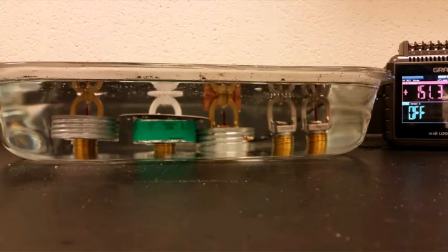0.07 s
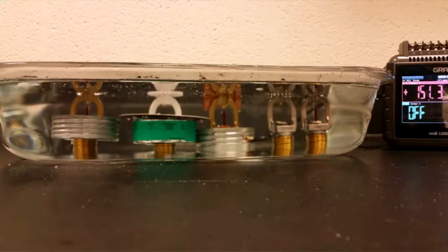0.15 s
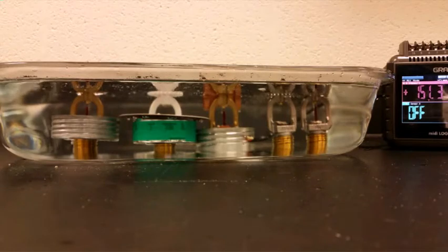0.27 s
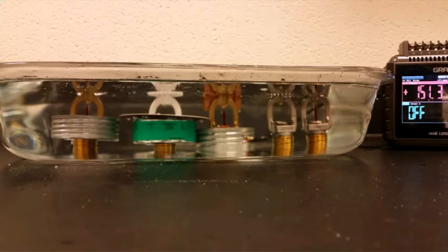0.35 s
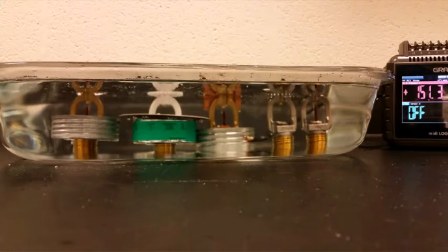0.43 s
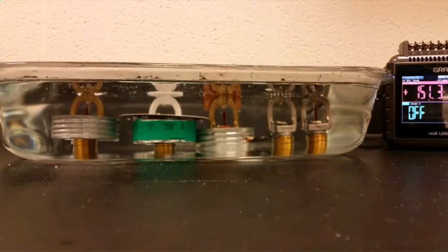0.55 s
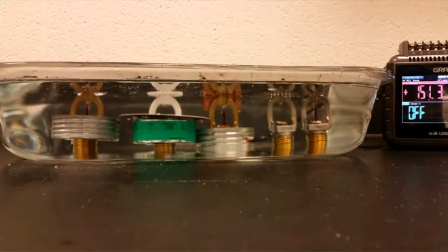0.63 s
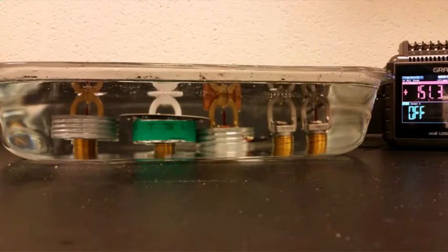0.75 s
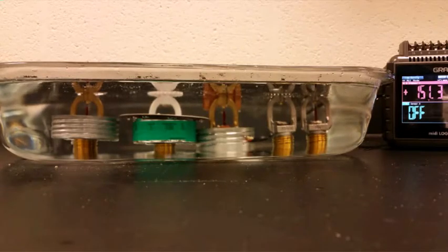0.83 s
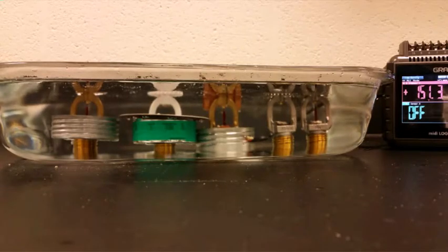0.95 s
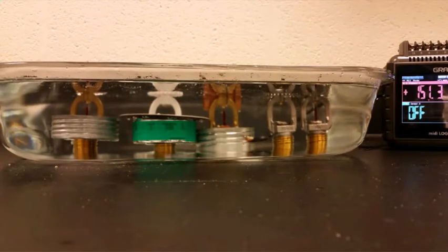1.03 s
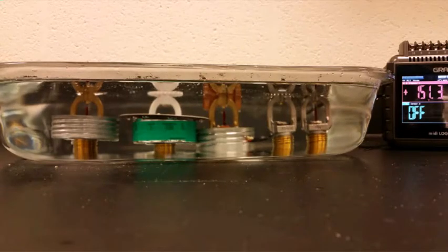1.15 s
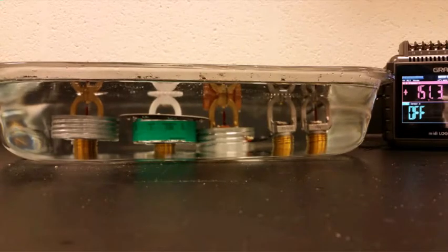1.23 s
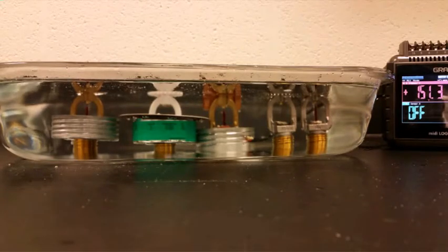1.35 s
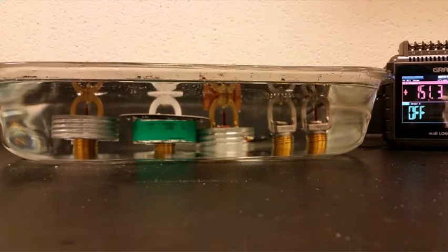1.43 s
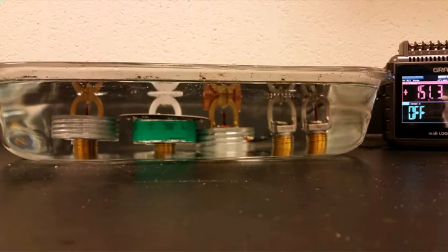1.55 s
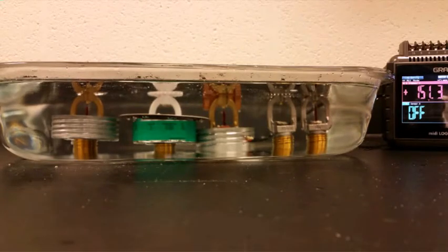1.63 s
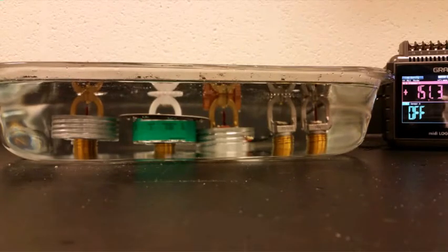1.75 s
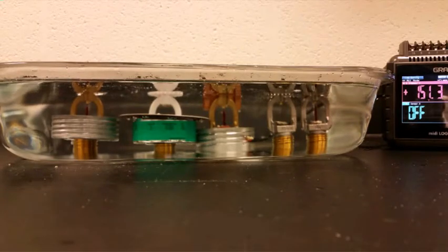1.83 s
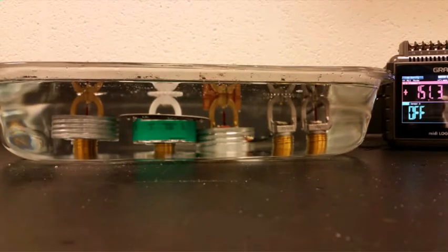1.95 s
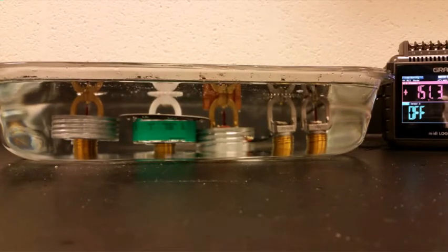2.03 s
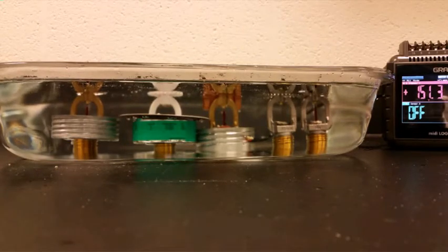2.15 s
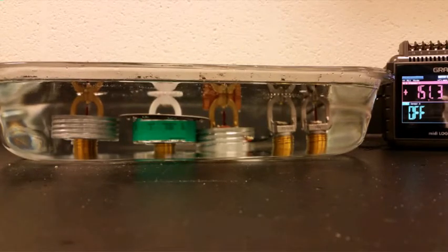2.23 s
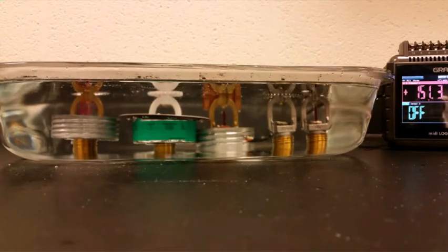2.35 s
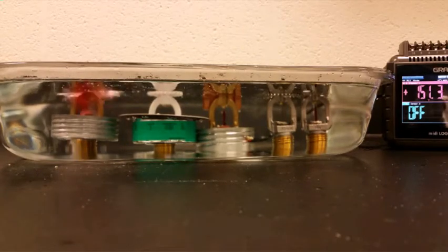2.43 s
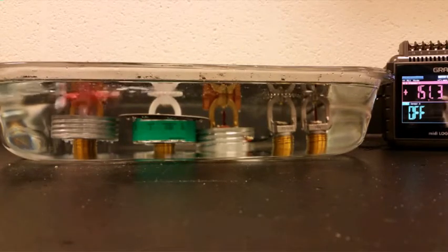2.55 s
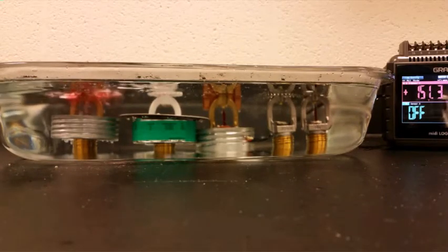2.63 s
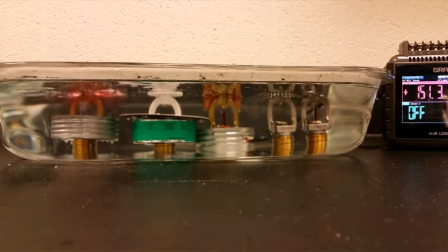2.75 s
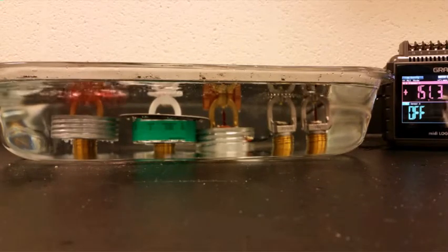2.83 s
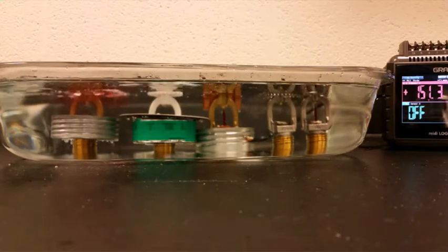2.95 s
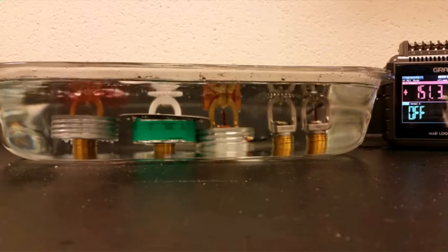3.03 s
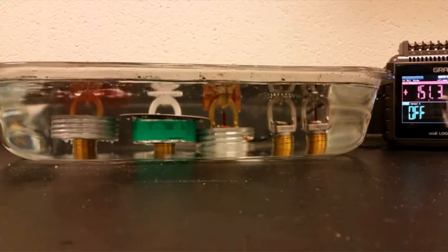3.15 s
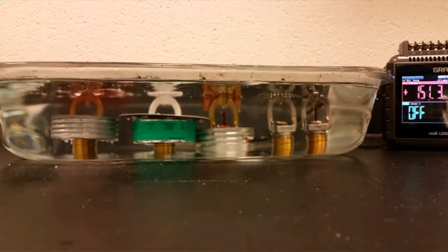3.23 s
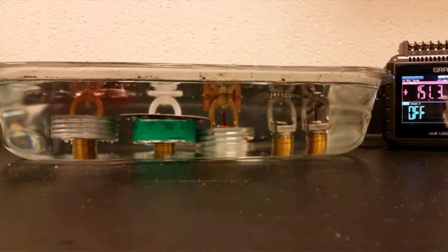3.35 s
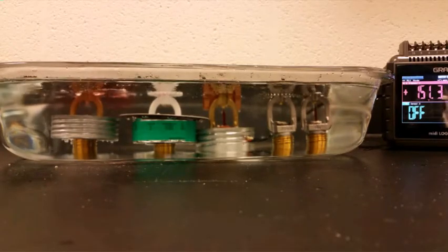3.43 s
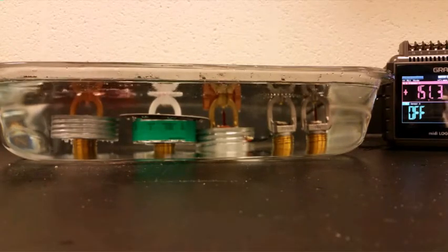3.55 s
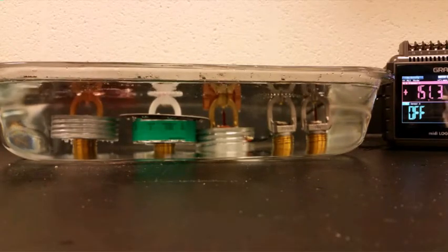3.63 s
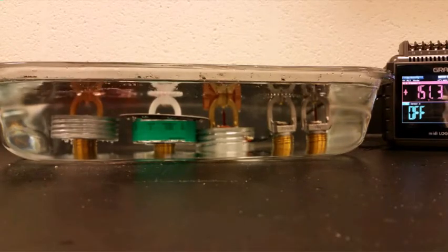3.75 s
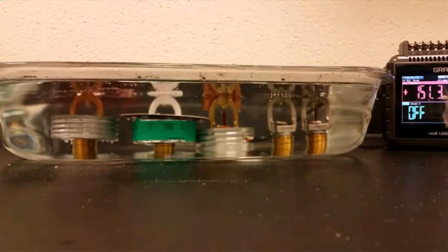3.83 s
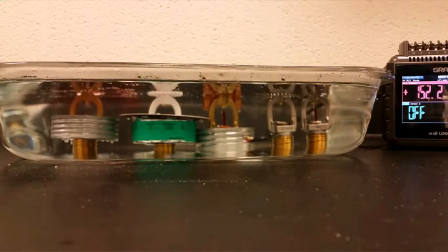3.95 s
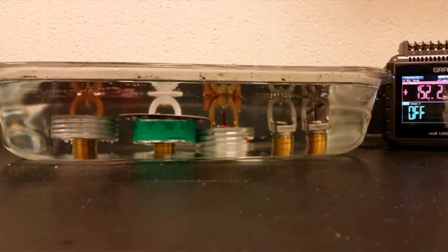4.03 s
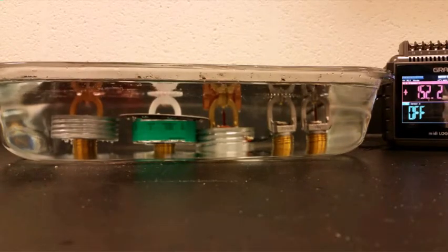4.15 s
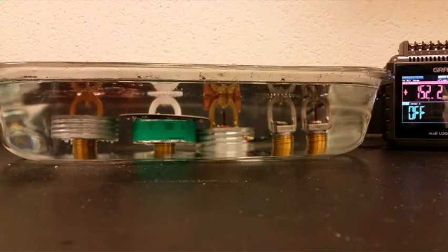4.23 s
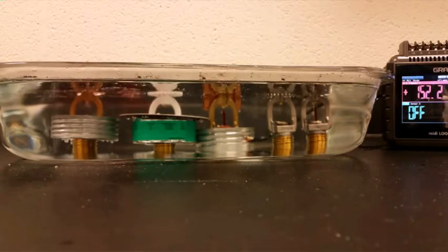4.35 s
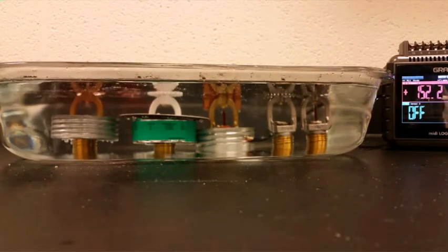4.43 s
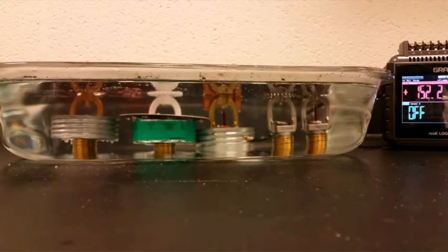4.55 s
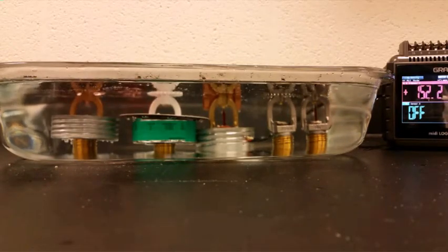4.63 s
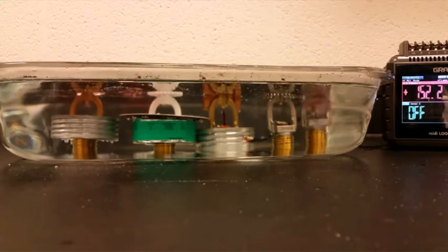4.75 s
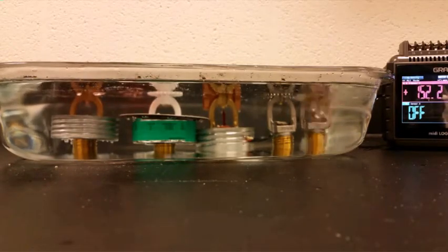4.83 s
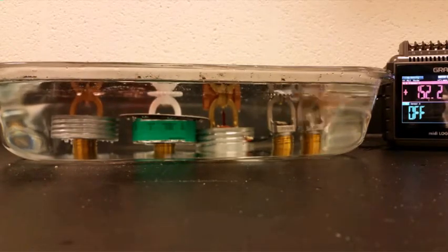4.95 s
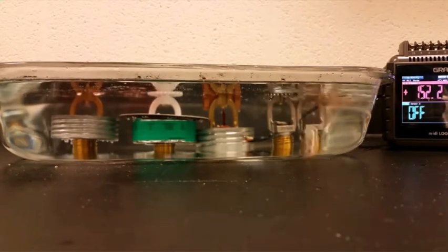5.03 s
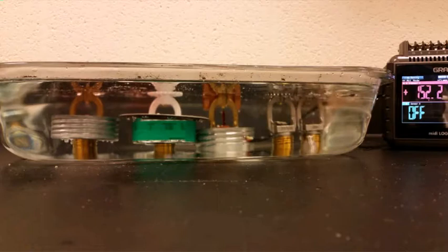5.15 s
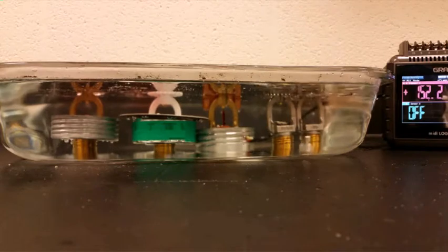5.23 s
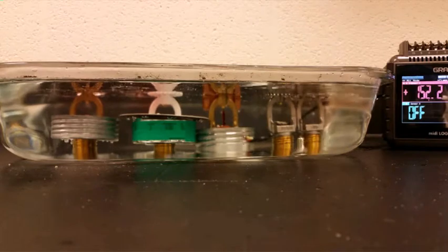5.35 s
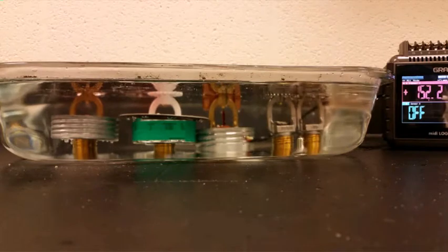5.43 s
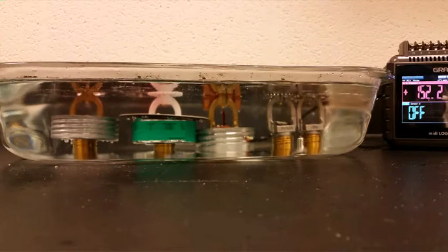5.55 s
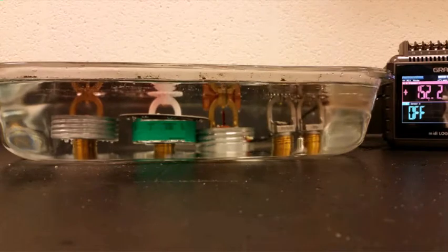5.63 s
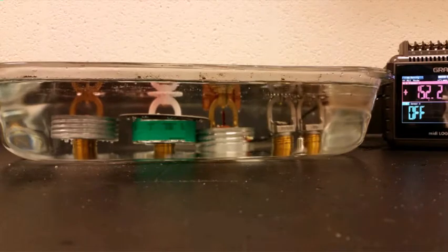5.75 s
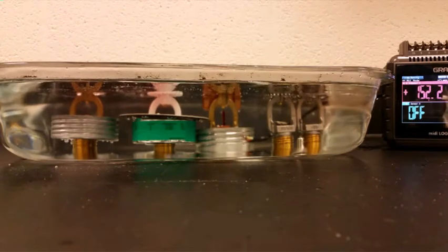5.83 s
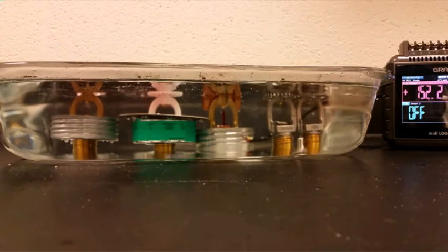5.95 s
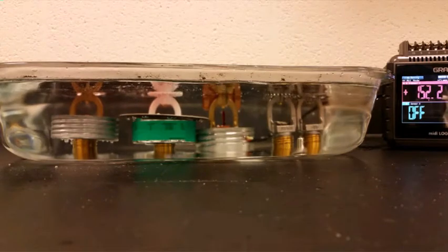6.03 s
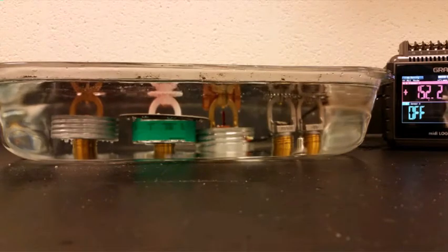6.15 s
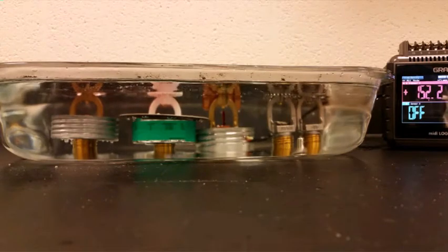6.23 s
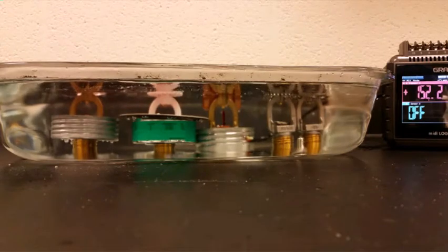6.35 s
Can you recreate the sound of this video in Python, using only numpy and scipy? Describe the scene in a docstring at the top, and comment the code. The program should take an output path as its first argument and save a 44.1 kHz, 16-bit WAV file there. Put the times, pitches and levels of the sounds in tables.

```python
"""A small room with a humming appliance, where two liquid-filled glass bulbs burst in a dish of hot water on a table.
Each burst is filtered fracture noise that excites decaying modes: the dish's glass rings and its body rocks.
The freed fittings knock against the same end of the dish; after the second burst splinters tick and skitter
over the bottom, the smaller the brighter. Wavering tones make the hum, shaped noise the fan rumble and hiss.
The recorder's gain control ducks the room after each burst, and its noise suppressor dulls what is left."""
import sys
import numpy as np
from scipy import signal
from scipy.fft import rfft, irfft
from scipy.io import wavfile
from scipy.ndimage import uniform_filter1d, minimum_filter1d

SR = 44100
rng = np.random.default_rng(int(sys.argv[2]) if len(sys.argv) > 2 else 0)


def persist_wave(psi):
    """Save psi, clipped to +-1, as 16-bit WAV."""
    counts = np.round(np.clip(psi, -1, 1) * 32767).astype(np.int16)
    wavfile.write(sys.argv[1], SR, np.atleast_2d(counts).T)


N = 281358
T = np.arange(N) / SR
FREQS = np.fft.rfftfreq(N, 1 / SR)


def undb(db):
    """Level law: amplitude gain is ten to the power of decibels over twenty."""
    return 10 ** (np.asarray(db) / 20)


def unit(x):
    """Normalization: scale a signal to an rms of 1."""
    return x / np.sqrt(np.mean(x ** 2))


def curve(points, freqs=FREQS):
    """Interpolation: read (Hz, value) points on a log-frequency axis."""
    hz, value = np.transpose(points)
    return np.interp(np.log(freqs + 1), np.log(hz), value)


def shape(x, gain):
    """Linear filtering: multiply the spectrum by a gain for each frequency."""
    return irfft(rfft(x) * gain, N)


def below(edge_hz, order):
    """Butterworth low-pass: the magnitude of its gain at each frequency."""
    return 1 / np.sqrt(1 + (FREQS / edge_hz) ** (2 * order))


def high_pass(edge_hz):
    """Second-order Butterworth high-pass in sections."""
    return signal.butter(2, edge_hz, "high", fs=SR, output="sos")


def low_pass(edge_hz, order):
    """Butterworth low-pass in sections."""
    return signal.butter(order, edge_hz, fs=SR, output="sos")


def walk(rate_hz):
    """Slow fluctuation: random steps smoothed twice, with an rms of 1."""
    k = int(SR / rate_hz)
    steps = np.repeat(rng.standard_normal(N // k + 1), k)
    smooth = uniform_filter1d(uniform_filter1d(steps, k), k)
    return unit(smooth[:N])


# Tones of the appliance's hum. Each row: frequency in Hz, rms level in dB before the
# left-right offset, random waver as a share of the steady tone.
HUM_TONES = [(120.66, -32, 0.085), (116.1, -46, 0.95), (298.8, -49, 0.35), (361, -58.5, 0.76),
             (445.5, -60, 0.45), (589, -66, .5), (691, -63, 0.42)]


def hum(waver_rate_hz=6, left_db=2.5, lag_s=0.0004):
    """Line spectrum: mains and motor tones waver in level and phase and reach the left microphone first."""
    arrival = np.array([T, T - lag_s])
    lines = 0
    for hz, db, waver in HUM_TONES:
        # a complex sway moves both the level and the phase
        sway = 1 + waver * (walk(waver_rate_hz) + 1j * walk(waver_rate_hz))
        tone = np.real(sway * np.exp(2j * np.pi * hz * arrival))
        lines = lines + undb(db) * unit(tone)
    return undb([[left_db], [-left_db]]) * lines


# Spectrum of fan rumble and room hiss. Each row: frequency in Hz, relative density in dB per Hz.
AIR_SPECTRUM = [(10, -19), (25, -14), (45, -1), (75, 1), (100, -2), (135, 2.5), (200, -6.5), (310, -11),
                (420, -17.5), (700, -23), (1600, -35), (4200, -40), (4700, -44), (7000, -43.5)]
# The air at the right microphone. Each row: frequency in Hz, level against the left in dB.
AIR_RIGHT_LEVEL = [(60, 1), (220, -1.5), (1000, -7), (2200, -6), (4000, -14), (6500, -26.5)]
# Likeness of the air at both microphones. Each row: frequency in Hz, correlation from -1 to 1.
AIR_CORRELATION = [(60, .94), (450, 0.93), (1000, 0.7), (2000, -.3), (3500, -0.13)]


def air(level_db=-33, edge_hz=7100, hiss_db=-72, flutter_db=-1.08, lag_s=0.00014):
    """Partial coherence: rumble and hiss most alike in the bass, later at the right, over microphone self-noise."""
    like = np.clip(curve(AIR_CORRELATION), -.99, .99)
    gain = undb(curve(AIR_SPECTRUM)) * below(edge_hz, order=24)
    # the sum and difference of these two noises have the wanted correlation
    mid = shape(rng.standard_normal(N), gain * np.sqrt(1 + like))
    side = shape(rng.standard_normal(N), gain * np.sqrt(1 - like))
    right_gain = undb(curve(AIR_RIGHT_LEVEL))
    # dividing by the level of the channels' sum keeps its spectrum even
    centre = np.sqrt((1 + right_gain ** 2 + 2 * like * right_gain) / 2)
    # the lag acts in the bass only
    later = np.exp(-2j * np.pi * FREQS * lag_s * below(250, order=2))
    left = shape(mid + side, 1 / centre)
    right = shape(mid - side, later * right_gain / centre)
    pair = np.array([left, right])
    pair *= undb(level_db + flutter_db * walk(8)) / np.std(pair.mean(axis=0))
    self_noise = undb(hiss_db) * rng.standard_normal((2, N))
    return pair + self_noise


def octaves(hz, low_hz=1500, high_hz=6000):
    """Contact hardness: octaves from 3 kHz, within the range that a harder or softer contact changes."""
    return np.log2(np.clip(hz, low_hz, high_hz) / 3000)


def response(points, tilt_db=0, size=512):
    """Minimum phase: a folded cepstrum gives a short causal response of a spectrum tilted in dB per octave."""
    freqs = np.fft.rfftfreq(size, 1 / SR)
    spectrum_db = curve(points, freqs) + tilt_db * octaves(freqs)
    cepstrum = irfft(np.log(undb(spectrum_db)))
    cepstrum[1:size // 2] *= 2
    cepstrum[size // 2 + 1:] = 0
    return irfft(np.exp(rfft(cepstrum)))


def mode(t, hz, db, t60, swell, phase):
    """Modal vibration: one resonance swells and dies away exponentially."""
    decay = np.exp(-np.log(1000) * t / t60)
    growth = 1 - np.exp(-t / swell)
    return undb(db) * decay * growth * np.sin(2 * np.pi * hz * t + phase)


# Spectrum of a crack before the tilt of its contact. Each row: frequency in Hz, relative level in dB.
CRACK_SPECTRUM = [(150, -21.5), (400, 1.5), (550, -15), (800, 4), (1150, 1), (1500, 0), (1900, 0),
                  (2600, 7.5), (4000, -3), (5000, 0.5), (6700, -2.5), (7600, -15), (10000, -18),
                  (15500, -28)]


def fracture(t, db, decay, tilt_db, build):
    """Fracture noise: random bursts in both microphones, shaped by a fast build-up and an exponential decay."""
    colour = response(CRACK_SPECTRUM, tilt_db)
    envelope = np.exp(-t / decay) * (1 - np.exp(-t / build))
    spray = rng.standard_normal((2, len(t))) * envelope
    return undb(db) * signal.lfilter(colour / np.linalg.norm(colour), 1, spray)


# Modes of the dish's glass, before water loading and added damping. Each row: frequency in Hz, relative
# level in dB struck at the left end, the same struck at the right end, 60 dB decay time in seconds.
GLASS_MODES = [(654, -18, -15, 0.11), (770, -9, -16, 0.102), (1174, -12, -18, 0.14), (1443, -3, -10, 0.04),
               (1801, -5, -11, 0.044), (2309, -11, -4, 0.046), (2762, -9, -2, 0.04), (3093, -11, -2, 0.04),
               (3636, -1, 0, 0.064), (3978, -8, -12, 0.093), (4363, -7, -8, 0.04), (4702, -21, -13, 0.068),
               (4864, -12, -15, 0.04), (5378, -11, -10, 0.052), (5914, -3, -6, 0.04), (6638, -1, -5, 0.04),
               (7160, -15, -23, 0.061), (7241, -15, -18, 0.063), (7364, -22, -26, 0.078)]


def glass_ring(t, end, ring_db, tilt_db, build, damping=1.1):
    """Modal excitation: where the blow lands decides which modes ring; small hard pieces favour the high ones."""
    out = 0
    for hz, *end_levels, t60 in GLASS_MODES:
        db = ring_db + np.interp(end, (0, 1), end_levels) + tilt_db * octaves(hz)
        # the moving water loads the wall a little differently each time
        loaded_hz = hz * (1 + .003 * rng.standard_normal())
        # each microphone faces another part of the wall
        phase = rng.uniform(0, 2 * np.pi, (2, 1))
        out = out + mode(t, loaded_hz, db, t60 / damping, build, phase)
    return out


# Modes of the filled dish rocking on the table; slow ones swell as the water follows. Each row: frequency in Hz,
# relative level in dB struck at the left end, the same at the right end, 60 dB decay time and swell in seconds.
BODY_MODES = [(62, -20.5, -11, 0.11, 0.0079), (115, -1, -8.5, 0.2, 0.031), (148.6, -18, -14.5, 0.21, 0.035),
              (188, -6.5, -22, 0.072, 0.0023), (206.1, -1.5, -0.5, 0.11, 0.0029),
              (236.95, -12, -12.5, 0.68, 0.052), (392, -25, -18.5, 0.093, 0.0061)]


def dish_rock(t, end, thump_db, rock_delay=0.0088, right_turn=3.2):
    """Rigid-body resonance: rocking starts late and pushes one microphone nearly as it pulls the other."""
    late = np.maximum(t - rock_delay, 0)
    turn = np.array([[0], [-right_turn]])  # radians
    out = 0
    for hz, *end_levels, t60, swell in BODY_MODES:
        db = thump_db + np.interp(end, (0, 1), end_levels)
        out = out + mode(late, hz, db, t60, swell, turn)
    return out


def blow(end, crack_db, decay, tilt_db, ring_db, thump_db, build=0.0011):
    """Superposition: one blow in both microphones is the sum of crack, ringing glass and rocking dish."""
    t = np.arange(SR) / SR
    short = t[:SR // 4]
    out = dish_rock(t, end, thump_db)
    out[:, :len(short)] += fracture(short, crack_db, decay, tilt_db, build)
    out[:, :len(short)] += glass_ring(short, end, ring_db, tilt_db, build)
    return out


# Bulbs bursting. Each row: start in seconds, end of the dish from 0 left to 1 right,
# crack level in dB, brightness in dB per octave.
BULB_BURSTS = [(2.4820, 0, 13, 2), (4.863, 0.82, 12.5, 1)]
BURST_DECAY_S, BURST_RING_DB, BURST_THUMP_DB = 0.0074, -2, 6  # ring and thump against the crack


def bursts():
    """Impulsive excitation: each bulb cracks, rings the glass and rocks the dish in proportion to its strength."""
    for start, end, db, tilt_db in BULB_BURSTS:
        yield start, blow(end, db, BURST_DECAY_S, tilt_db, db + BURST_RING_DB, db + BURST_THUMP_DB)


# Freed fittings striking the dish. Each row: start in seconds, crack level in dB,
# brightness in dB per octave, thump level in dB.
FITTING_KNOCKS = [(2.5297, 10, -1.5, 1.5), (2.5443, 4.5, -5.5, 4.5), (2.5606, 1.5, 4.5, 1.5),
                  (4.9322, 11.5, 1, 15), (4.9652, 10.5, 0, 7.5), (4.9901, 6.5, -1.5, -9.5),
                  (5.004, 5, 0.5, 5.5), (5.024, -8, -7, -21), (5.1641, -22, -3, -8.5)]
KNOCK_DECAY_S, KNOCK_RING_DB = 0.004, -10.5  # ring against the crack


def knocks():
    """Impact: the fittings strike the end of the dish where the latest bulb burst."""
    for start, db, tilt_db, thump_db in FITTING_KNOCKS:
        end = [place for time, place, *_ in BULB_BURSTS if time < start][-1]
        yield start, blow(end, db, KNOCK_DECAY_S, tilt_db, db + KNOCK_RING_DB, thump_db)


SPLINTER_END, SPLINTER_DECAY_S = 0.4, 0.0042  # place from 0 left to 1 right
SPLINTER_RING_DB, SPLINTER_THUMP_DB = -13, -22  # against the crack


def tick(db, tilt_db):
    """Light impact: a small piece of glass touches the bottom and hardly rocks the dish."""
    ring_db, thump_db = db + SPLINTER_RING_DB, db + SPLINTER_THUMP_DB
    return blow(SPLINTER_END, db, SPLINTER_DECAY_S, tilt_db, ring_db, thump_db)


# Splinters landing. Each row: start in seconds, crack level in dB.
SPLINTER_LANDINGS = [(5.2003, -8.5), (5.2249, -12.5), (5.2455, -16), (5.2625, -21), (5.2875, -18),
                     (5.3698, -18.5), (5.402, -18)]
SPLINTER_TILT_DB, TILT_PER_DB = 1.5, 0.58  # brightness per octave at 0 dB, and its rise for each dB weaker


def splinters():
    """Size scaling: the smaller the landing piece, the weaker and brighter its tick."""
    for start, db in SPLINTER_LANDINGS:
        yield start, tick(db, SPLINTER_TILT_DB - TILT_PER_DB * db)


SKITTER_START_S, SKITTER_GAP_S, SKITTER_COUNT = 5.274, 0.0073, 14
SKITTER_DB, SKITTER_FADE_DB_PER_S = -15.5, 168
SKITTER_SCATTER_DB, SKITTER_TILT_DB = -0.5, 11.5  # tilt per octave


def skitter():
    """Repeated impact: the finest splinters make a quick, uneven run of tiny ticks that dies away."""
    for k, (slip, size) in enumerate(rng.standard_normal((SKITTER_COUNT, 2))):
        after = SKITTER_GAP_S * (k + abs(slip) / 2)
        db = SKITTER_DB - SKITTER_FADE_DB_PER_S * after + SKITTER_SCATTER_DB * size
        yield SKITTER_START_S + after, tick(db, SKITTER_TILT_DB)


def room(x, t60=0.39, treble_t60=0.23, wet_db=-12, gap_s=0.0013, low_hz=350, treble_hz=4500):
    """Reverberation: close walls and table answer with a short diffuse tail whose treble dies first."""
    t = np.arange(SR // 2) / SR
    noise = signal.sosfilt(high_pass(low_hz), rng.standard_normal((2, len(t))))
    dull = signal.sosfiltfilt(low_pass(treble_hz, 2), noise)
    treble = noise - dull
    tail = dull * np.exp(-np.log(1000) * t / t60) + treble * np.exp(-np.log(1000) * t / treble_t60)
    tail *= t > gap_s
    tail /= np.linalg.norm(tail, axis=1, keepdims=True)
    return x + undb(wet_db) * signal.fftconvolve(x, tail, axes=1)[:, :N]


# The dish at the right microphone. Each row: frequency in Hz, gain of the right channel in dB.
DISH_RIGHT_GAIN = [(100, -19), (220, -15.5), (450, -3.5), (1000, -2), (2200, -4.5), (4000, -12.5),
                   (6500, -21.5), (8000, -4), (15000, 6.5)]


def dish():
    """Spatial hearing: every blow sounds in the room, and a filter makes the right channel weaker at most pitches."""
    out = np.zeros((2, N + SR))
    for start, sound in [*bursts(), *knocks(), *splinters(), *skitter()]:
        i = int(start * SR)
        out[:, i:i + SR] += sound
    left, right = room(out[:, :N])
    return np.array([left, signal.fftconvolve(right, response(DISH_RIGHT_GAIN))[:N]])


def scene():
    """Superposition: the dish, the hum and the air add up."""
    return dish() + hum() + air()


def duck(x, limit_db, depth_db, hold, release_db, ahead):
    """Gain control: drop just before a peak of x over the limit, wait, then rise at release_db a second."""
    wanted_db = np.clip(limit_db - 20 * np.log10(np.abs(x) + 1e-9), -depth_db, 0)
    k, lead = int(hold * SR) // 2, int(ahead * SR)
    held_db = minimum_filter1d(wanted_db, 2 * k + 1, origin=k, mode="nearest")
    gain_db = release_db * T + np.minimum.accumulate(held_db - release_db * T)
    early_db = np.pad(gain_db[lead:], (0, lead), mode="edge")
    return undb(uniform_filter1d(early_db, lead))


def suppress(x, open_db=-52, slope=0.81, depth_db=13, low_hz=800, high_hz=7900, window_s=.03):
    """Downward expansion: the quieter the left middle and treble band, the further both channels' bands drop."""
    band = signal.sosfiltfilt(high_pass(low_hz), x)
    band = signal.sosfiltfilt(low_pass(high_hz, 12), band)
    power = uniform_filter1d(band[0] ** 2, int(window_s * SR))
    band_db = 10 * np.log10(np.abs(power) + 1e-14)
    gain = undb(np.clip(slope * (band_db - open_db), -depth_db, 0))
    return x + band * (gain - 1)


def record(dry, top_hz=15900):
    """Dynamic control: shared slow gain, noise suppressor, fast limiter per channel, fade-in, steep top cut."""
    peak = np.abs(dry).max(axis=0)
    x = dry * duck(peak, limit_db=-1, depth_db=17, hold=0.92, release_db=27, ahead=0.0014)
    x = suppress(x)
    limiter = dict(limit_db=-.6, depth_db=24, hold=.0008, release_db=1500, ahead=.0004)
    x = np.array([side * duck(side, **limiter) for side in x])
    x *= np.minimum(T / .01, 1)
    return signal.sosfilt(signal.ellip(8, .2, 70, top_hz, fs=SR, output="sos"), x)


dry = scene()
out = record(dry)
persist_wave(out)
```